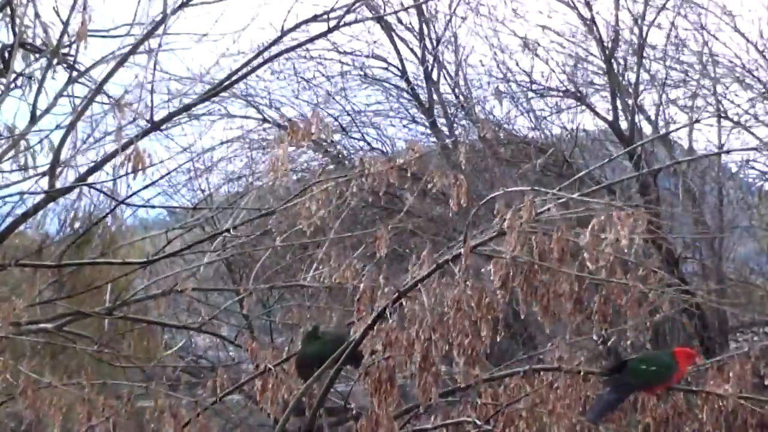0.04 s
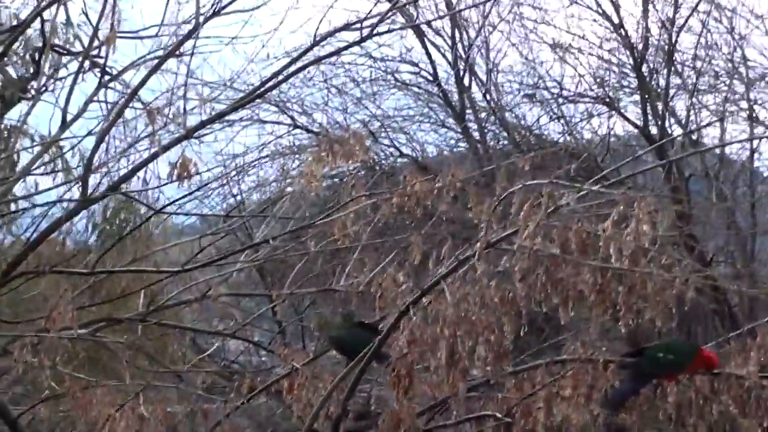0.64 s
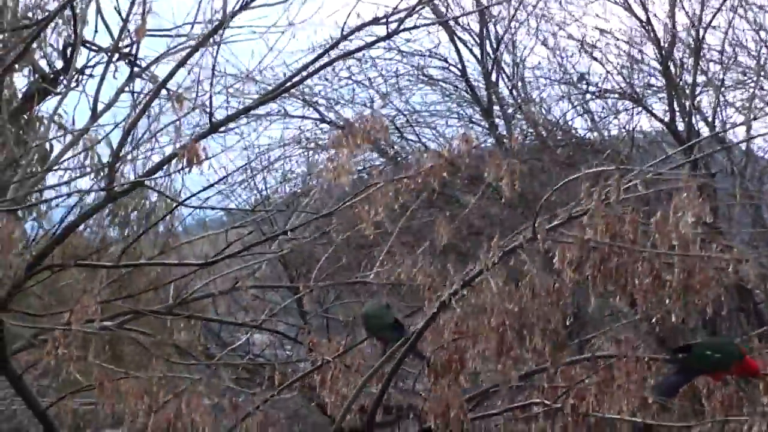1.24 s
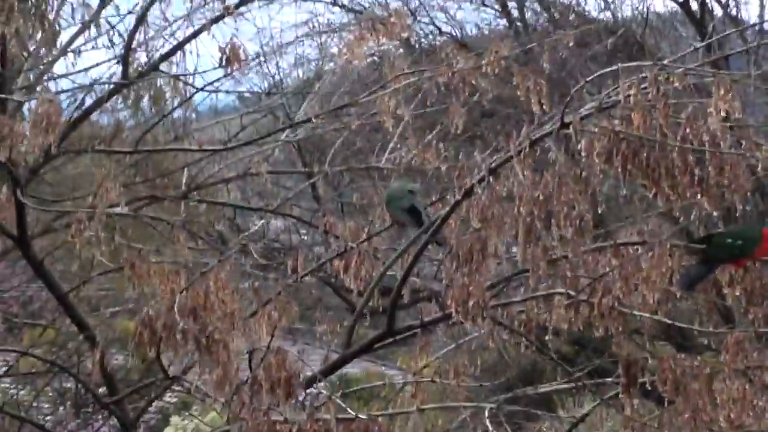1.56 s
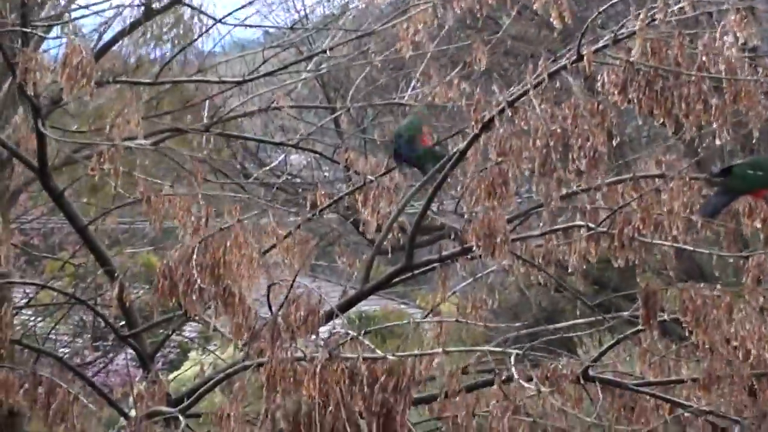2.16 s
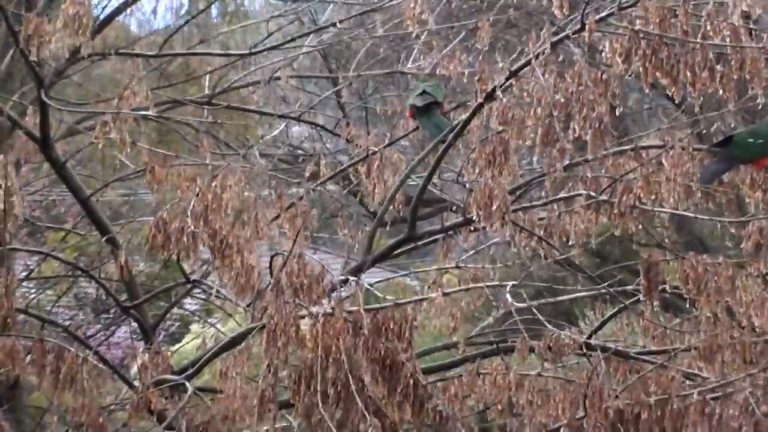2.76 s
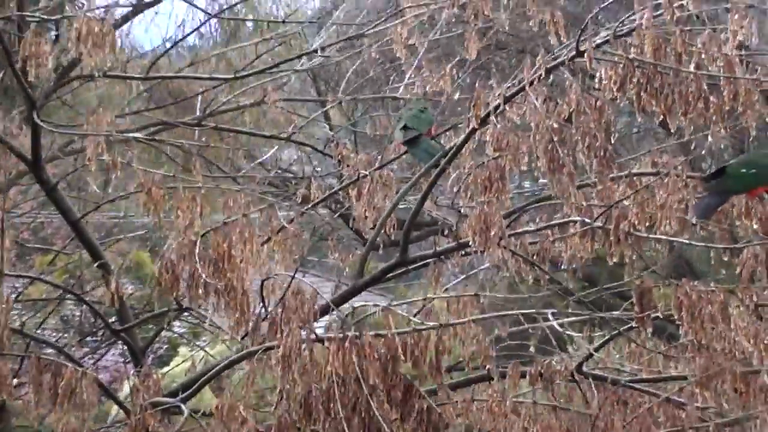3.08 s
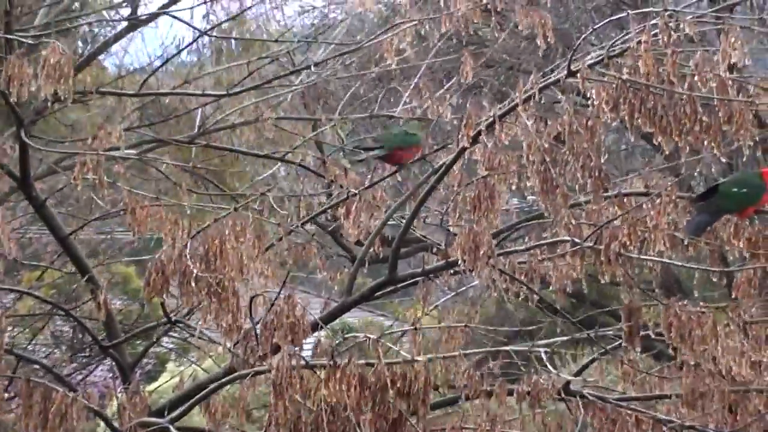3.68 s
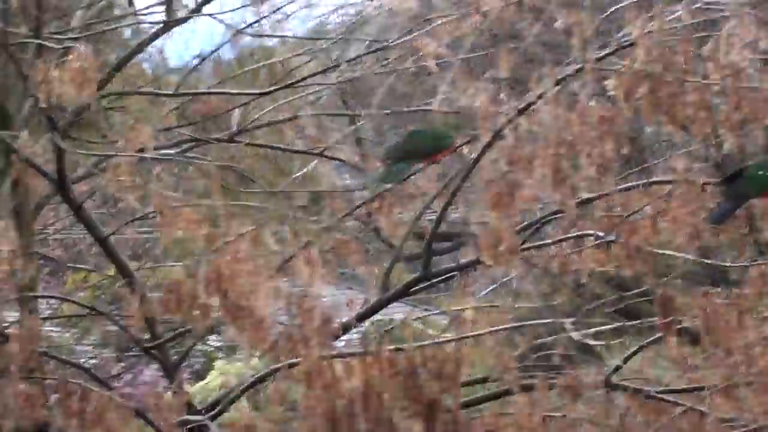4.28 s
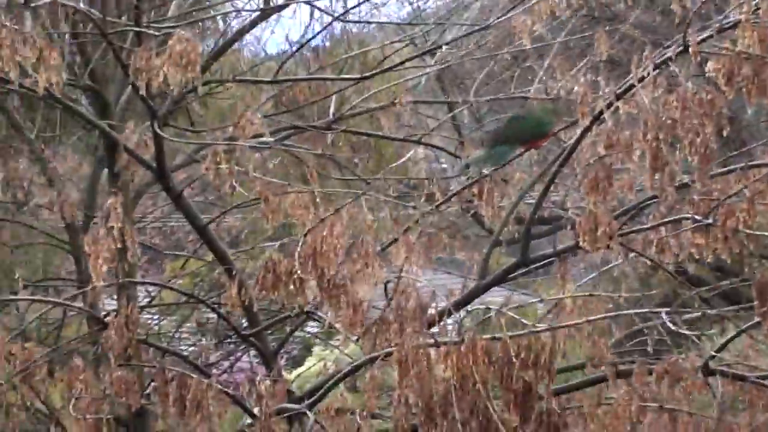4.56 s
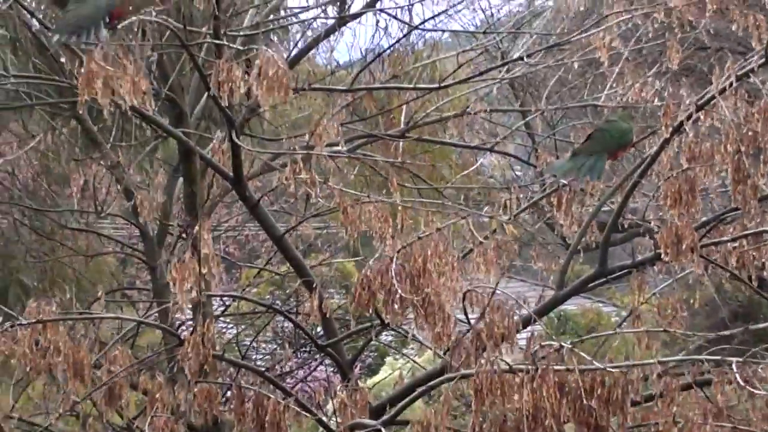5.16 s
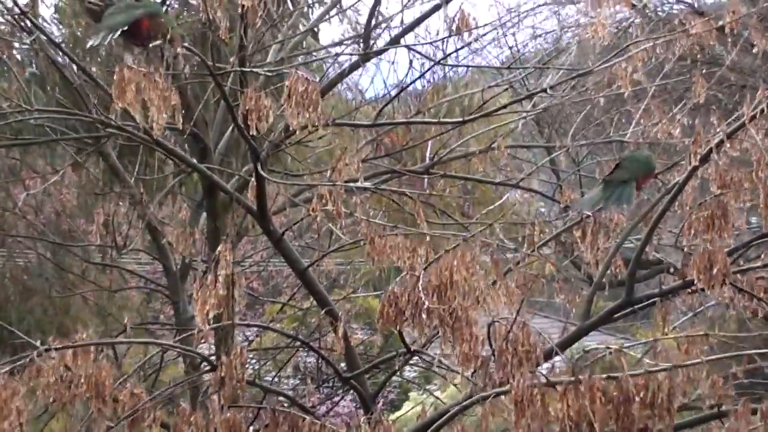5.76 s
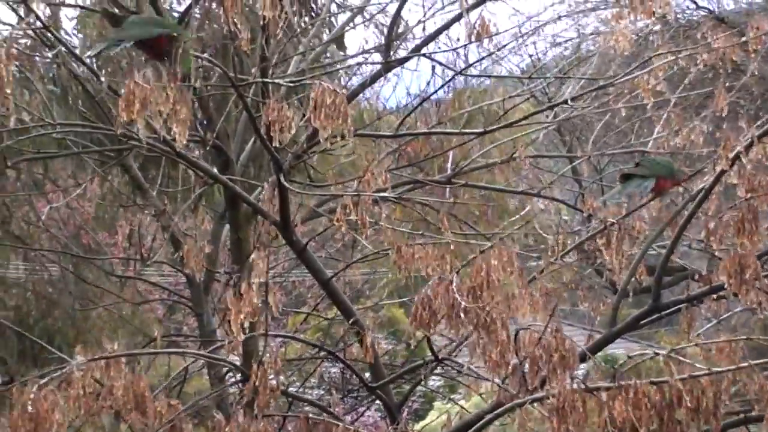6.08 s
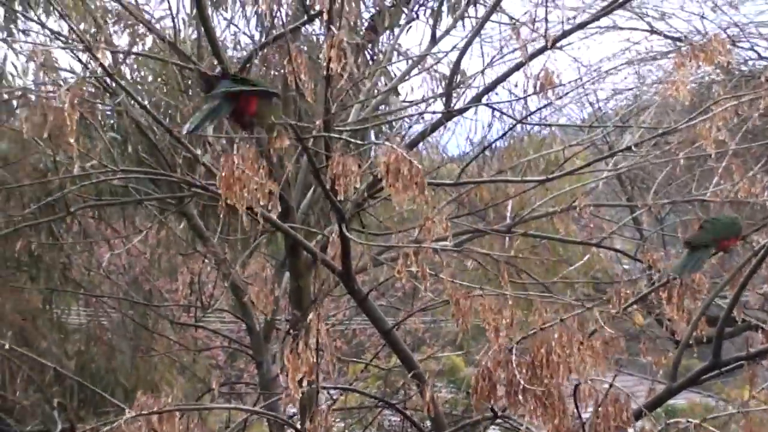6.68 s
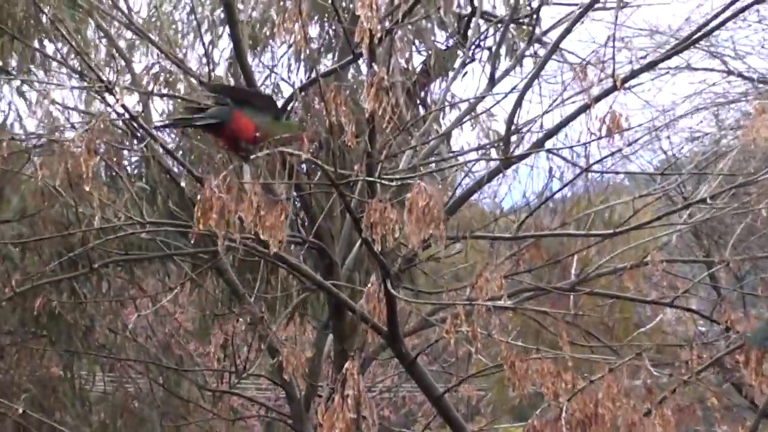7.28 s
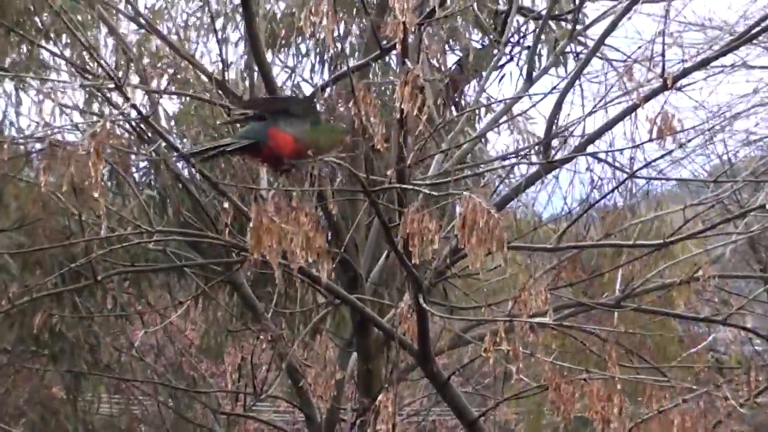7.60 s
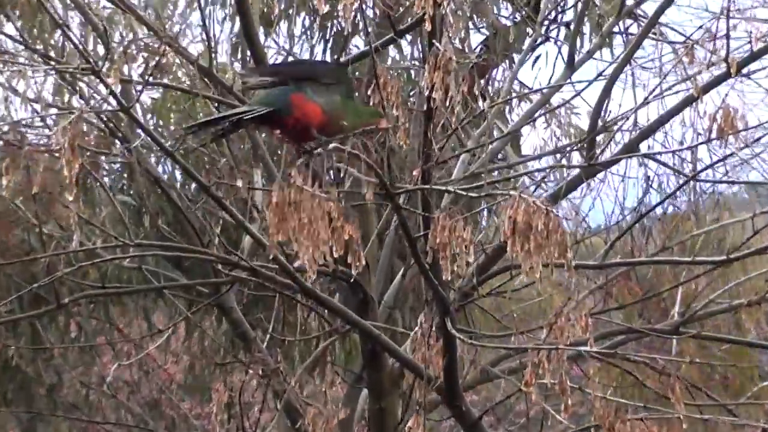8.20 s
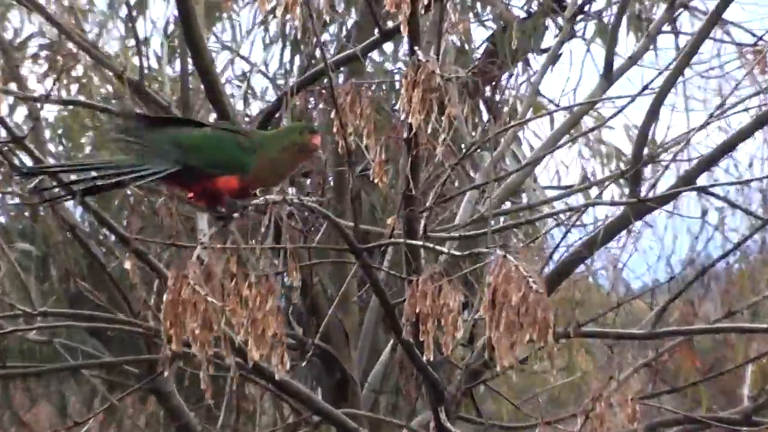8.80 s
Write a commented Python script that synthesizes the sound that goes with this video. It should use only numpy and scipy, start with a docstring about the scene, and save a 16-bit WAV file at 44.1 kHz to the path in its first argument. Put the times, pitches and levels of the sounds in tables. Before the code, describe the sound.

Uneven wind rumble on the microphone, a soft rustle of dry seed pods, and one brief raspy parrot chirp during a lull.

```python
"""Gusty breeze in bare branches

Gusts buffet the two microphone ports with a low rumble, and the hardest eddies make a limiter duck
everything. Behind them a breeze hisses through branches hung with dry seed pods, over the wash of
distant trees. A parrot chirps once in a raspy whistle and two pods snap; a faint squeak passes
early on, and something far off hums for a moment."""
import sys
import numpy as np
from scipy import signal
from scipy.io import wavfile
from scipy.ndimage import uniform_filter1d

SR = 44100
rng = np.random.default_rng(int(sys.argv[2]) if len(sys.argv) > 2 else 0)


def dump(signal):
    """Clip the signal to [-1, 1] and save it as 16-bit WAV at the path in sys.argv[1]."""
    limited = np.clip(np.atleast_2d(signal).T, -1, 1)
    pcm = np.round(limited * 32767).astype(np.int16)
    wavfile.write(sys.argv[1], SR, pcm)


N = 389844
TIME = np.arange(N) / SR


def from_db(db):
    """Decibels to gain."""
    return 10 ** (np.asarray(db) / 20)


def unit_rms(x):
    """Scale to unit power."""
    return x / np.sqrt(np.mean(x ** 2) + 1e-20)


def automation(rows):
    """One curve per column after the time column, sample by sample."""
    times, *columns = np.transpose(rows)
    return [np.interp(TIME, times, column) for column in columns]


def at_hz(points, hz):
    """Read a curve on a log-frequency axis."""
    freqs, values = np.transpose(points)
    return np.interp(np.log(hz + 1e-9), np.log(freqs), values)


def butter(x, hz, kind, order=2):
    """Butterworth filter."""
    return signal.sosfilt(signal.butter(order, np.clip(hz, 10, .48 * SR), kind, fs=SR, output="sos"), x)


def drift(rate_hz):
    """Smooth random modulation with an RMS of 1."""
    step, settle = 40, 2000
    pole = np.exp(-2 * np.pi * step * rate_hz / SR)
    white = rng.standard_normal(N // step + settle + 2)
    slow = signal.lfilter([1], [1, -2 * pole, pole * pole], white)[settle:]
    return np.interp(np.arange(N) / step, np.arange(len(slow)), unit_rms(slow))


def noise_bands(spectrum, correlation, count):
    """Coloured stereo noise as (centre Hz, band) pairs whose powers sum to 1."""
    edges = np.geomspace(spectrum[0][0], spectrum[-1][0], count + 1)
    centres = np.sqrt(edges[1:] * edges[:-1])
    power = from_db(at_hz(spectrum, centres)) ** 2 * np.diff(edges)
    white = rng.standard_normal((2, 2, N))  # neighbouring bands get unrelated noise
    for k, hz in enumerate(centres):
        mid, side = butter(white[k % 2], edges[k:k + 2], "band", order=3)
        alike = np.clip(at_hz(correlation, hz), -1, 1)
        pair = np.sqrt(1 + alike) * mid + np.sqrt(1 - alike) * side * [[1], [-1]]
        yield hz, unit_rms(pair) * np.sqrt(power[k] / power.sum())


# Tone of the wind rumble: f/Hz, relative density/dB
RUMBLE_SPECTRUM = [(13, -45), (22, -22), (91, -2.5), (158, 1), (324, -5), (478, -14.5), (730, -27.5),
                   (1800, -46), (2340, -80), (3960, -120)]
# Its stereo image, narrow in the bass and wide on top: f/Hz, left-right correlation
RUMBLE_IMAGE = [(30, 0.92), (60, 0.99), (130, 0.79), (290, 0.69), (640, 0.34), (1500, 0.045)]
def buffeting(force, full_db, brighten, knee_hz, flicker_db, slap_db, crossing_s):
    """Port turbulence: faster flow sheds smaller eddies, so the upper bands grow fastest and slap."""
    excess_db = np.clip(20 * np.log10(force + 1e-9) - full_db, -16, 4.5)
    slaps = np.clip([drift(90), drift(86)], -2, 2) + np.clip(drift(88), -2, 2)  # per port + shared
    rumble = np.zeros((2, N))
    for hz, band in noise_bands(RUMBLE_SPECTRUM, RUMBLE_IMAGE, count=12):
        octaves = np.clip(np.log2(hz / knee_hz), -1, 1.6)
        tilt_db = brighten * octaves * excess_db
        rumble += band * from_db(tilt_db + slap_db * max(octaves, 0) * slaps + flicker_db * drift(51))
    left, right = rumble * force
    return np.array([left, np.interp(TIME - crossing_s, TIME, right)])  # eddies hit the left port first


# Bed of steady flow past the ports, before its trim: t/s, level/dB
STEADY_FLOW = [(0, -17), (0.2, -47), (0.55, -39), (0.78, -31), (0.95, -24), (1.64, -22.5), (1.8, -36.5),
               (2.3, -34), (2.6, -62), (3.65, -54), (3.76, -48), (4.8, -44), (5.57, -52.5), (5.66, -30.5),
               (6.25, -23.5), (7.35, -25.5), (8.2, -30.5), (8.84, -35.5)]
# Gust hits on top of it, before their trim: t/s, hold/s, level/dB
GUST_HITS = [(0.0, 0.047, -19.5), (0.112, 0.027, -19.5), (0.334, 0.026, -25), (0.467, 0.046, -15),
             (0.57, 0.012, -18.5), (0.655, 0.039, -19.5), (0.853, 0.029, -19.5), (1.223, 0.064, -20),
             (1.33, 0.07, -17), (1.49, 0.15, -22), (2.198, 0.017, -30), (2.284, 0.011, -27.5),
             (3.745, .03, -37.5), (4.042, .02, -41), (5.76, 0.018, -20.5), (5.945, 0.092, -24),
             (6.22, 0.11, -16), (6.378, 0.11, -15), (6.537, 0.11, -13.5), (6.666, 0.13, -11),
             (6.838, 0.21, -12.5), (7.166, 0.039, -20.5), (7.322, 0.068, -18.5), (7.508, 0.014, -20.5),
             (7.596, 0.048, -16.5), (7.696, 0.092, -18), (7.864, 0.076, -16), (7.966, 0.12, -11.5),
             (8.251, 0.011, -22.5), (8.39, 0.025, -13), (8.444, 0.26, -20.5), (8.536, 0.098, -12)]
def wind_force(flow_trim_db, gust_trim_db, attack_s, release_s, eddy_db, wobble_db):
    """Wind envelope: gusts rise, hold and die on a steady flow, and all of it breaks into eddies."""
    flow_db, = automation(STEADY_FLOW)
    power = from_db(flow_db + flow_trim_db) ** 2
    for start, hold_s, db in GUST_HITS:
        fade = np.maximum(start - TIME, 0) / attack_s + np.maximum(TIME - start - hold_s, 0) / release_s
        power += from_db(db + gust_trim_db) ** 2 * np.exp(-2 * np.minimum(fade, 20))
    churn_db = wobble_db * drift(21) + eddy_db * eddies(count=600, gap_s=.036, half_width_s=0.0074)
    return np.sqrt(power) * from_db(churn_db)


def eddies(count, gap_s, half_width_s):
    """The flow sheds short swells of uneven strength and spacing: a modulator centred near zero."""
    swells = np.zeros(N)
    gaps, sizes = rng.uniform([.3, .5], [1.7, 1], (count, 2)).T
    for centre, size in zip(np.cumsum(gaps) * gap_s, sizes):
        near = slice(*np.searchsorted(TIME, [centre - 4 * half_width_s, centre + 4 * half_width_s]))
        swells[near] += size * np.exp(-((TIME[near] - centre) / half_width_s) ** 2)
    return np.minimum(swells, 1) - swells.mean()


# Fader ride of the breeze, which hiss, pods and wash follow: t/s, level/dB
BREEZE_RIDE = [(0, -45), (0.8, -42), (1.7, -42), (2.2, -44), (4.5, -44), (6.2, -45.5), (7.3, -47.5),
               (7.8, -44.5), (8.84, -44.5)]
# Airy hiss of the pod-hung branches: f/Hz, relative density/dB
HISS_SPECTRUM = [(1410, -2), (2400, -15.5), (3850, -5.5), (4360, -4), (4870, -4.5), (6070, -1.5),
                 (7380, -0.5), (10100, -13), (15100, -22), (15700, -22)]
# Low wash of the distant trees: f/Hz, relative density/dB
WASH_SPECTRUM = [(24, -50), (40, -9), (91, 3), (108, 11.5), (142, -0.5), (233, 2), (295, 1), (411, 0),
                 (493, -4), (712, 2), (3200, -16), (4160, -23.5), (7040, -120)]
def breeze(hiss_trim_db, pod_trim_db, wash_db, wash_follow):
    """Moving air stirs branches and pods; the distant trees follow only a share of its swing."""
    ride_db, = automation(BREEZE_RIDE)
    swing_db = ride_db - ride_db.mean()
    hiss = from_db(ride_db + hiss_trim_db) * trees(HISS_SPECTRUM, bands=14, flutter_db=0.3)
    pods = from_db(ride_db + pod_trim_db) * pod_rustle(clicks_per_s=120, spread_db=2, clump_db=4.5)
    wash = from_db(wash_db + wash_follow * swing_db) * trees(WASH_SPECTRUM, bands=15, flutter_db=0.44)
    return (hiss + pods + wash) * from_db([[.35], [-.35]])  # leans slightly left


# Stereo image of the trees, widest in the presence range: f/Hz, left-right correlation
TREE_IMAGE = [(60, 1), (290, 1), (640, 0.99), (1410, 0.96), (2800, 0.55), (4500, 0.79), (8000, 0.8),
              (14000, 1)]
def trees(spectrum, bands, flutter_db):
    """Countless far rustles merge into a noise whose bands flutter a little."""
    layers = noise_bands(spectrum, TREE_IMAGE, bands)
    return sum(band * from_db(flutter_db * drift(16.0)) for _, band in layers)


def pod_rustle(clicks_per_s, spread_db, clump_db):
    """Nearer pods brush each other: eight bands of tiny clicks, each with its own clumping and pan."""
    rustle = np.zeros((2, N))
    for hz in np.geomspace(3500, 8500, num=8):
        touches = rng.random(N) < clicks_per_s * from_db(clump_db * drift(5)) / SR
        clicks = touches * rng.standard_normal(N)
        clicks *= from_db(spread_db * np.minimum(rng.exponential(1, N), 3))
        pan = from_db(rng.normal(0, 1.4) * np.array([[1], [-1]]))
        rustle += butter(clicks + 1e-18, [hz / 1.105, hz * 1.017], "band") * pan
    return unit_rms(rustle)


# The parrot's chirp: t/s, pitch/Hz, fundamental/dB, octave/dB
PARROT_CHIRP = [(5.17, 3750, -47, -80), (5.205, 4030, -41.5, -70), (5.25, 3850, -42, -68),
                (5.275, 3690, -40, -41), (5.295, 3570, -42, -30.5), (5.312, 3620, -34.5, -29),
                (5.335, 3620, -38, -45), (5.36, 3870, -46, -56), (5.388, 4900, -48, -76)]
# A faint squeak that flicks up, then falls: t/s, pitch/Hz, fundamental/dB, octave/dB
FAINT_SQUEAK = [(2.515, 1680, -53, -70), (2.53, 2160, -44, -53), (2.543, 1820, -39, -53),
                (2.56, 1250, -46, -66)]
def bird(call, clear_hz, rasp_span_hz, flutter_db):
    """A whistle with its octave; away from its clear note a fast unsteady warble makes it rasp."""
    hz, fundamental_db, octave_db = automation(call)
    rasp = np.minimum(np.abs(hz - clear_hz) / rasp_span_hz, 1)
    warble_hz = 260 + 90 * drift(90)
    warble = np.sin(2 * np.pi * np.cumsum(warble_hz) / SR) + .5 * drift(400)
    phase = 2 * np.pi * np.cumsum(hz * (1 + .06 * rasp * warble)) / SR
    tone = from_db(fundamental_db) * np.sin(phase) + from_db(octave_db) * np.sin(2 * phase)
    gate = (TIME > call[0][0]) & (TIME < call[-1][0])
    return tone * from_db(flutter_db * drift(110)) * gate


def garden_echoes(x, echo_db, t60, count=24):
    """The direct sound plus faint echoes off trunks and ground, different at each port."""
    out = np.array([x, x])
    delays, signs = rng.uniform(.004, .13, count), rng.choice([-1, 1], count)
    for k, (delay_s, sign) in enumerate(zip(delays, signs)):
        lag = int(delay_s * SR)
        out[k % 2, lag:] += sign * from_db(echo_db - 60 * delay_s / t60) * x[:-lag]
    return out


# Dry pod one-shots: t/s, peak/dB, resonance/Hz, bandwidth/Hz, t60/s
POD_SNAPS = [(7.0812, -24, 5060, 1200, .011), (7.131, -23, 7360, 3800, 0.0098)]
def pod_snaps(crack_db):
    """A dry pod breaks: milliseconds of splintering, coloured by one broad resonance of its shell."""
    out, t = np.zeros(N), np.arange(SR // 20) / SR
    for start, peak_db, hz, width_hz, t60 in POD_SNAPS:
        burst = rng.choice([-1, 1], len(t)) * from_db(-60 * t / t60)
        shell = butter(burst, [hz - width_hz / 2, hz + width_hz / 2], "band")
        snap = shell + from_db(crack_db) * butter(burst, hz, "high", order=1)
        at = round(start * SR)
        out[at:at + len(t)] += from_db(peak_db) * snap / np.abs(snap).max()
    return out


# One swell of the far hum, out of near silence and back: t/s, level/dB
HUM_SWELL = [(4.65, -66), (4.84, -36.5), (5.1, -36), (5.52, -40), (5.8, -66)]
def far_hum(hz, waver):
    """A low, slightly unsteady tone, like a distant engine."""
    level_db = automation(HUM_SWELL)[0] + 1.2 * drift(6.5)
    pitch_hz = hz * (1 + waver * drift(4.5))
    return from_db(level_db) * np.sin(2 * np.pi * np.cumsum(pitch_hz) / SR)


def limiter(x, threshold_db, slope, release_db_per_s, attack_s):
    """Power over the threshold quickly ducks the gain by a share of the excess; it then climbs back."""
    window = int(attack_s * SR)
    power = np.abs(uniform_filter1d(np.mean(x ** 2, axis=0), window))
    duck_db = slope * np.maximum(10 * np.log10(power + 1e-12) - threshold_db, 0)
    release_ramp = release_db_per_s * TIME
    held_db = np.maximum.accumulate(duck_db + release_ramp) - release_ramp
    return x * from_db(-uniform_filter1d(held_db, window))


def scene():
    """The garden bed and its spot sounds, with wind on the microphone over the top."""
    garden = breeze(hiss_trim_db=0.5, pod_trim_db=-12, wash_db=-37, wash_follow=0.67)
    calls = sum(bird(call, clear_hz=3530, rasp_span_hz=400, flutter_db=4.0)
                for call in (PARROT_CHIRP, FAINT_SQUEAK))
    garden += garden_echoes(calls, echo_db=-9.5, t60=0.5)
    garden += pod_snaps(crack_db=-24)
    garden += far_hum(hz=157, waver=0.0047)
    force = wind_force(flow_trim_db=-1.5, gust_trim_db=-0.7, attack_s=0.0088, release_s=0.013,
                       eddy_db=6.5, wobble_db=1.03)
    wind = buffeting(force, full_db=-17.0, brighten=0.59, knee_hz=181.5,
                     flicker_db=1.0, slap_db=2.5, crossing_s=0.00053)
    return wind + garden


def record(dry):
    """Master chain: the limiter holds the gusts down, then a steep high cut at 15.55 kHz."""
    limited = limiter(dry, threshold_db=-14.0, slope=.65, release_db_per_s=130, attack_s=0.0026)
    high_cut = signal.ellip(10, .1, 70, 15550, fs=SR, output="sos")
    return signal.sosfiltfilt(high_cut, limited)


dry = scene()
out = record(dry)
dump(out)
```